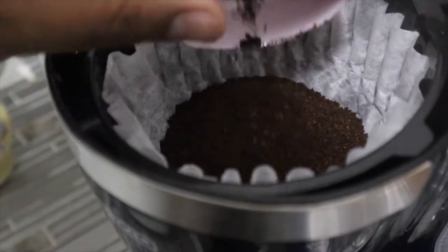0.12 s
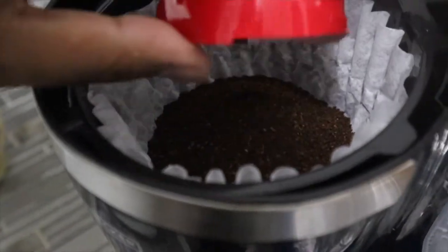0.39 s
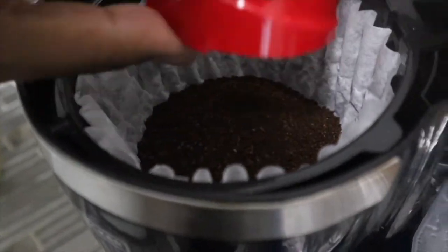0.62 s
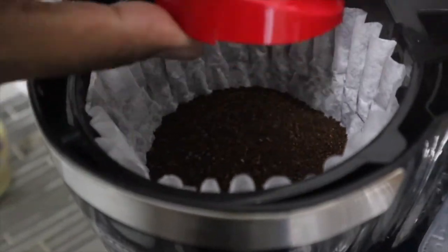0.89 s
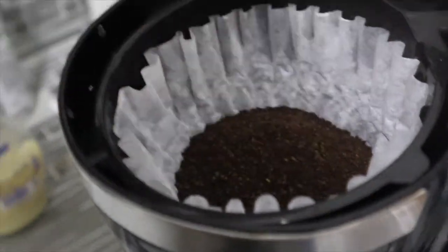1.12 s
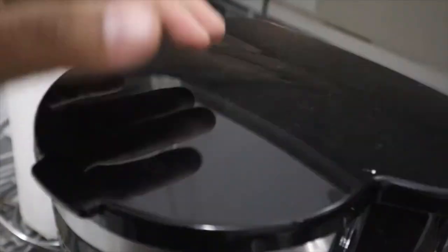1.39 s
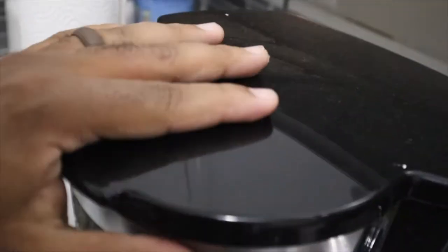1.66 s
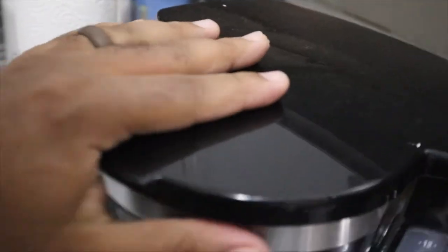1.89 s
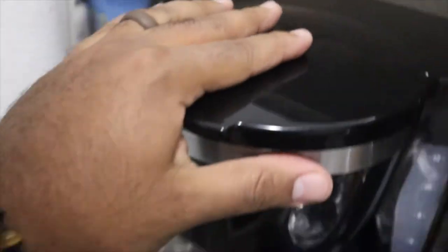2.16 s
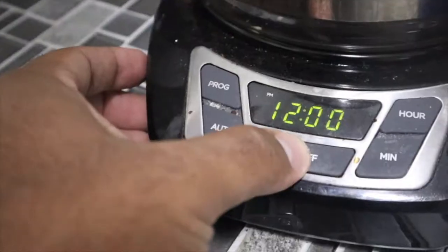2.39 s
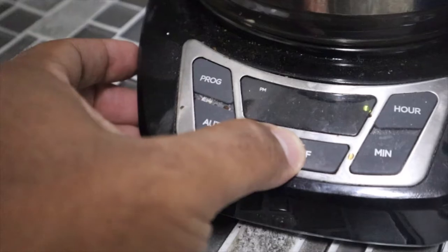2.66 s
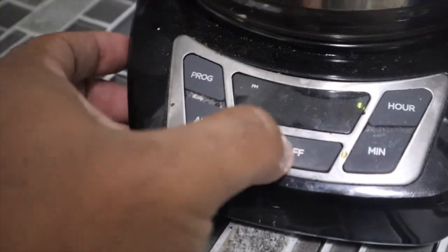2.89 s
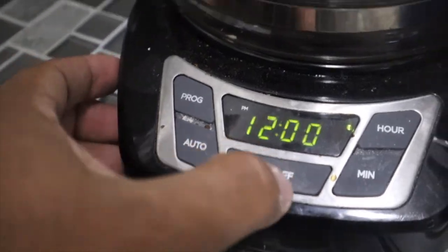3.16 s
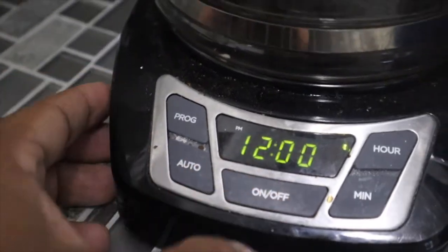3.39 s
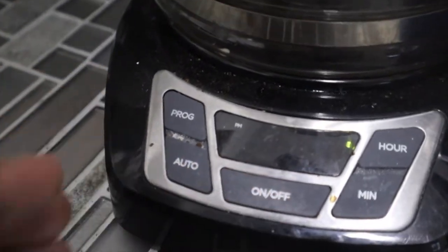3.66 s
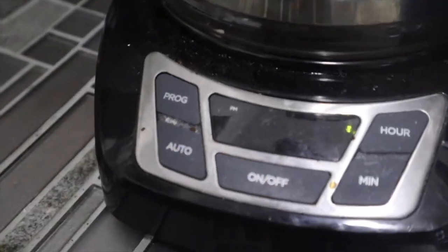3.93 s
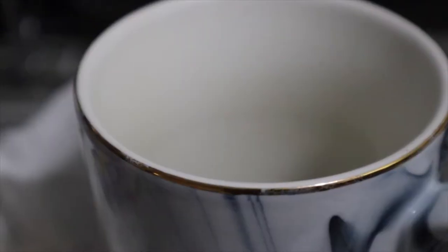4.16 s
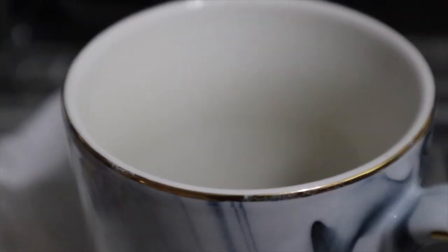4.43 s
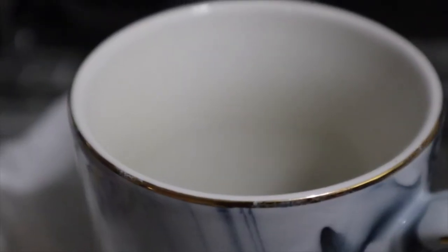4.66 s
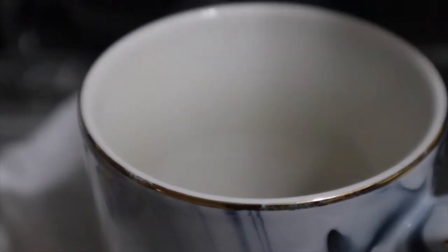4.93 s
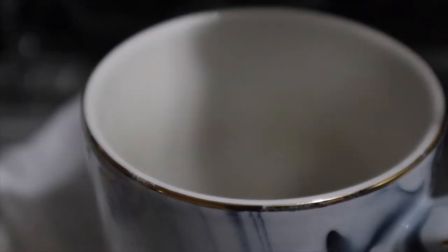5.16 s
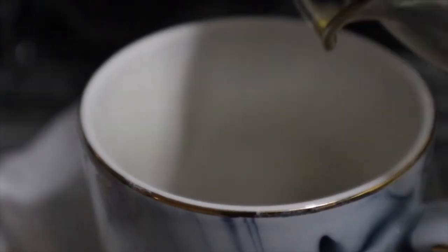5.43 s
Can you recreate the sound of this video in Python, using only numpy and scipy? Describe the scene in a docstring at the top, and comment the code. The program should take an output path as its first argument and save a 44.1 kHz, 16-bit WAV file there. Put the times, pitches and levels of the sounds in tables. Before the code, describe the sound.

A quiet kitchen with a low steady hum, recorded close in stereo with a short room echo. At 0 s the last coffee grounds hiss softly onto paper and die away within half a second; tiny dry ticks follow until 0.7 s. At about 1.25 s plastic knocks lightly, and at 1.42 s the thin lid clatters shut, very loud, with a scrape and a low counter shake, then a lesser tap at 1.58 s. From 1.85 to 2.05 s the machine slides with a rising, squeaky rub, then hollow thuds, loudest at 2.17 s, and dragging that cuts off dead at 2.3 s. A button knocks softly at 2.65 s, a crisp relay snaps at 2.7 s, and the button knocks again at 2.94 s. Faint skin rustles around 3.4 s. A distant reverberant knock sounds at 3.8 s. The room tone crossfades near 4 s to a bassier one; a small lid rattles and a glass jug clinks at 4.5 s, then faint rustling.

```python
"""Coffee maker on a kitchen counter

In a quiet humming kitchen grounds hiss into a paper filter, a plastic lid shuts and the machine is pushed along.
A button and a relay snap, something knocks far off, and a glass jug is lifted over a second room tone.
Blows ring decaying sine modes under a crack of noise; drags, sleeves and grounds are dense random grains.
A resonator bank that follows the hand's speed squeaks, and noise tails give the room in mid and side."""
import sys
import numpy as np
from scipy import signal
from scipy.fft import rfft, irfft, next_fast_len
from scipy.io import wavfile
from scipy.ndimage import uniform_filter1d

SR = 44100
rng = np.random.default_rng(int(sys.argv[2]) if len(sys.argv) > 2 else 0)


def amplitude_ratio(level_db):
    """Convert a level in decibels to the matching linear amplitude (field) ratio."""
    exponent = np.asarray(level_db, float) / 20
    return 10 ** exponent


def put_to_file(sound):
    """Save the sound as 16-bit audio at rate SR, in the file named by the first command-line argument."""
    columns = np.atleast_2d(sound).T  # one column per channel
    safe = np.clip(columns, -1, 1)
    whole_steps = np.round(safe * 32767)
    wavfile.write(sys.argv[1], SR, whole_steps.astype(np.int16))


N = 244739
TIME = np.arange(N) / SR


def evened(x):
    """Scales to rms 1."""
    return x / np.sqrt(np.mean(x ** 2) + 1e-20)


def read(points, hz):
    """Reads a table on a log-frequency axis."""
    f, value = np.transpose(points)
    return np.interp(np.log(hz + 1), np.log(f + 1), value)


def coloured(x, points):
    """Filters the last axis by a (frequency [Hz], level [dB]) spectrum."""
    size = x.shape[-1]
    return irfft(rfft(x) * amplitude_ratio(read(points, np.fft.rfftfreq(size, 1 / SR))), size)


def slow(size):
    """Smooth chance of rms 1, averaged twice over size samples."""
    return evened(uniform_filter1d(uniform_filter1d(rng.standard_normal(N), size), size))


def add(mix, s, sound):
    """Mixes a sound in at time s."""
    part = mix[round(s * SR):][:len(sound)]
    part += sound[:len(part)]


def stroke(start, rise, hold, db, release):
    """Gain of one gesture: a smooth rise, a hold, then a fall in dB per second."""
    t = TIME - start
    fall_db = release * np.maximum(t - rise - hold, 0)
    return amplitude_ratio(db - fall_db) * np.sin(np.pi / 2 * np.clip(t / rise, 0, 1)) ** 2


def grainy(points, per_s, spread_db):
    """Dense tiny contacts of uneven size, coloured by what they rub, at rms 1."""
    size = amplitude_ratio(spread_db * np.minimum(rng.exponential(1, N), 5))
    grains = size * (rng.random(N) < per_s / SR) * rng.standard_normal(N)
    return evened(coloured(grains, points))


# crack of a blow, before its hardness tilts it: (frequency [Hz], level [dB])
CRACK_SPECTRUM = [(300, -24), (1200, 1), (3000, 5.5), (6000, -6), (10000, -12.5), (12500, -13.5),
                  (15500, -51)]


def strikes(blows, modes, crack_s, order=0):
    """Rattling contacts ring modes under a crack; order 1 gives low modes the same sign, -1 alternating signs."""
    low_hz = 500  # modes below this move the whole object
    hz, db, t60 = np.transpose(modes)[:, :, None]
    crack_hz, crack_shape_db = np.transpose(CRACK_SPECTRUM)
    t, out = TIME[:SR // 4], np.zeros(N)
    for s, peak_db, crack_db, hardness, contact_s in blows:
        # the spot that is hit drives each mode one way or the other
        sides = rng.choice([-1, 1], hz.shape)
        if order:
            sides = np.where(hz < low_hz, order ** np.arange(len(hz))[:, None], sides)
        mode_gain = amplitude_ratio(db + hardness * np.log2(hz / 1000) - 60 * t / t60)
        body = (sides * mode_gain * np.sin(2 * np.pi * hz * t)).sum(0)

        rattle = rng.standard_normal(2000) * np.exp(-t[:2000] / (contact_s / 3))
        rattle[0] += 0.62 * np.linalg.norm(rattle)  # stresses the first touch
        ring = signal.fftconvolve(body, rattle)[:len(t)]
        # nothing sounds below half its lowest mode
        ring = signal.lfilter(*signal.butter(2, hz.min() / 2, "high", fs=SR), ring)

        tilted_db = crack_shape_db + hardness * np.log2(crack_hz / 1000)
        crack = coloured(rng.standard_normal(len(t)), np.column_stack([crack_hz, tilted_db]))
        crack *= amplitude_ratio(-60 * t / (crack_s + 2 * contact_s)) * np.minimum(t / 0.0016, 1)
        blow = ring / abs(ring).max() + amplitude_ratio(crack_db) * crack / abs(crack).max()
        add(out, s, amplitude_ratio(peak_db) * blow)
    return out


# width of the diffuse air: (frequency [Hz], side over mid [dB])
DIFFUSE_WIDTH = [(60, -35), (130, -12.5), (290, -9.5), (640, -2), (1410, 2.5), (3100, 6.5), (6820, 7),
                 (15000, 6.5)]


def room_tone(points, db, hums, turn):
    """Steady air and appliance noise; turn [rad] mixes a quarter-cycle copy of the mid into the side."""
    mid, side = coloured(rng.standard_normal((2, N)), points)
    quarter_cycle = signal.hilbert(mid, next_fast_len(N))[:N].imag
    side = np.cos(turn) * side + np.sin(turn) * quarter_cycle
    tone = amplitude_ratio(db) / mid.std() * np.array([mid, coloured(side, DIFFUSE_WIDTH)])
    f = np.fft.rfftfreq(N, 1 / SR)
    for hz, width, hum_db in hums:
        # a narrow band of noise wavers like a hum
        hum = irfft(rfft(rng.standard_normal(N)) / (1 + (2 * (f - hz) / width) ** 2), N)
        tone[0] += amplitude_ratio(hum_db) * evened(hum)
    return tone


# first room tone: (frequency [Hz], level [dB])
FIRST_AIR = [(13, -53), (22, -21), (49, -7), (198, -4), (220, -4), (306, -5.5), (371, -3.5), (403, -9.5),
             (698, -14.5), (869, -15), (970, -20), (1280, -20), (5170, -39.5), (11500, -49.5), (15500, -69)]
# its hums: (frequency [Hz], width [Hz], mid level [dB])
FIRST_HUMS = [(60.1, 0.089, -49), (117.7, 2.8, -63.5), (241.3, 8.9, -56), (321, 12, -58)]


def first_room_tone():
    """Shaped noise and narrow-band hums of the kitchen, faded out late on."""
    fade = np.interp(TIME, (3.81, 4.3), [1, 0])
    return fade * room_tone(FIRST_AIR, -44.5, FIRST_HUMS, -0.71)


# grounds on paper: (frequency [Hz], level [dB])
GROUNDS_SPECTRUM = [(1180, -17), (2000, -6), (2610, -9), (7880, -1.5), (11600, -8), (13200, -13),
                    (13900, -34), (15100, -26), (15500, -73)]


def pouring_grounds():
    """The last grounds fall on paper: dense grains that hold briefly and die away."""
    level_db, hold_s, release_db_per_s = -48, 0.1, 81
    fall_db = release_db_per_s * np.maximum(TIME - hold_s, 0)
    return grainy(GROUNDS_SPECTRUM, 8000, 0.83) * amplitude_ratio(level_db - fall_db)


# small dry ticks of grounds, skin and plastic: (time [s], peak [dB], centre frequency [Hz])
SMALL_TICKS = [(0.2053, -36, 6550), (0.2424, -41, 10200), (0.3497, -43.5, 5880), (0.5432, -48, 7100),
               (0.7128, -47.5, 4050), (2.5293, -46, 4250), (2.904, -49, 6250), (3.191, -46.5, 6070),
               (3.2, -47, 10500), (3.4284, -37, 11400), (4.8648, -39, 7940)]


def ticks():
    """Noise snaps of a few milliseconds, a wide band round their centre."""
    t, out = TIME[:1500], np.zeros(N)
    for s, peak_db, hz in SMALL_TICKS:
        band = [(hz / 4, -24), (hz * 0.65, -4), (hz, 0), (hz * 2, -10)]
        snap = coloured(rng.standard_normal(len(t)), band)
        snap *= amplitude_ratio(-60 * t / 0.019) * np.minimum(t / 0.0019, 1)
        add(out, s, amplitude_ratio(peak_db) * snap / abs(snap).max())
    return out


# hands and sleeves moving: (start [s], rise [s], hold [s], level [dB], release [dB per s])
SLEEVE_MOVES = [(1.121, 0.022, 0.028, -60.5, 600), (3.18, 0.018, .03, -71, 302),
                (3.294, 0.097, 0.18, -60.5, 80), (3.748, 0.027, 0.15, -67, 117),
                (4.16, 0.043, 0.027, -60.5, 40), (4.797, .09, 0.68, -64, 104)]
# skin and cloth: (frequency [Hz], level [dB])
SLEEVE_SPECTRUM = [(1470, -28), (2500, 7), (2640, 5.5), (3340, -3.5), (4170, -0.5), (5360, -6),
                   (6150, -6.5), (9580, -10.5), (11400, -2.5), (14100, -21), (15500, -35)]


def rustles():
    """Hands and sleeves move: dense bright grains swell and fall with each gesture."""
    return grainy(SLEEVE_SPECTRUM, 9000, 0.92) * sum(stroke(*move) for move in SLEEVE_MOVES)


# plastic on plastic: (start [s], hold [s], scrape level [dB], hiss over scrape [dB], scrape release [dB per s])
PLASTIC_DRAGS = [(1.227, 0.11, -50.5, -2.5, 300), (1.457, 0.041, -28, -11.5, 103),
                 (2.062, 0.051, -35.5, -5.5, 300), (2.185, 0.097, -33, -14, 300)]
# scraping housing: (frequency [Hz], level [dB])
SCRAPE_SPECTRUM = [(240, -14), (400, 0), (531, -0.5), (864, 7), (1070, 0), (1520, 0.5), (1700, -5.5),
                   (2000, -2), (2240, -5.5), (4500, -17.5), (5850, -47), (9900, -120)]
# hissing surface, shared with slide(): (frequency [Hz], level [dB])
HISS_SPECTRUM = [(1760, -12), (3000, -10), (3590, -14), (4350, -10.5), (7960, -21.5), (10600, -23),
                 (12400, -31), (15500, -99)]


def drags():
    """Stick and slip of dragged or swung plastic: the housing scrapes and the surface hisses."""
    rise_s = 0.064
    scrape, hiss = np.zeros((2, N))
    for s, hold, db, over_db, release in PLASTIC_DRAGS:
        scrape += stroke(s, rise_s, hold, db, release)
        hiss += stroke(s, rise_s, hold, db + over_db, 1.18 * release)
    return grainy(SCRAPE_SPECTRUM, 3000, 0.61) * scrape + grainy(HISS_SPECTRUM, 9000, 2.0) * hiss


# lid: (time [s], ring peak [dB], crack over ring [dB], hardness [dB per octave], rattling contact [s])
LID_HITS = [(1.233, -28.5, -3.5, -5, 0.015), (1.4165, -5, -7.5, -2.5, 0.008),
            (1.423, -6.5, -0.5, -6, 0.0089), (1.432, -0.5, -14, -3, 0.012), (1.437, 0.5, -7, 0, 0.011),
            (1.447, -9, -3, -5, 0.0025), (1.581, -14, -6, -11, 0.008)]
# modes of the lid: (frequency [Hz], relative level [dB], t60 [s])
LID_MODES = [(243.3, -8, 0.2), (329, 1, 0.099), (403, 7, 0.017), (522, -1, 0.031), (677, 8.5, 0.044),
             (773, 8.5, 0.024), (978, 10, 0.021), (1160, 3.5, 0.025), (1390, -0.5, 0.023),
             (1625, -6, 0.033), (1970, 4.5, 0.027), (2530, -20, 0.016), (3000, -8.5, 0.026),
             (3400, -18, 0.011), (4050, 9, 0.0076), (4440, -2, 0.0023), (5370, -13, 0.017)]


def lid_blows():
    """The thin plastic lid clatters shut and rings its modes."""
    return strikes(LID_HITS, LID_MODES, 0.022, order=1)


# machine: (time [s], ring peak [dB], crack over ring [dB], hardness [dB per octave], rattling contact [s])
MACHINE_HITS = [(1.248, -14.5, -7.5, 3, 0.0055), (2.059, -9, -7.5, -5, 0.013),
                (2.0665, -6, -11, -9.5, 0.0089), (2.079, -11.5, -9, -5.5, 0.0056),
                (2.143, -15.5, -4, -6, 0.047), (2.168, 3.5, -19.5, 1, 0.0071),
                (2.175, -6, -25, 1.5, 0.0021), (2.237, -16, -22, 0, 0.0073),
                (2.2645, -12, 1.5, -8.5, 0.008), (2.277, -11, -9, -0.5, 0.0092)]
# modes of the housing: (frequency [Hz], relative level [dB], t60 [s])
MACHINE_MODES = [(143, -4.5, 0.049), (243, -2.5, 0.069), (314, -2, 0.038), (431, 5, 0.035), (668, 9, 0.02),
                 (810, 3.5, 0.021), (1060, 2, 0.011), (1520, 12.5, 0.0067), (1850, -3, 0.04),
                 (1990, 1, 0.03), (2600, 3.5, 0.0064), (2970, 0.5, 0.015), (3750, -6, 0.011),
                 (4400, -33, .007)]


def machine_blows():
    """The hollow housing thuds as the machine is handled and pushed back."""
    return strikes(MACHINE_HITS, MACHINE_MODES, 0.011, order=1)


# weight on the machine: (start [s], hold [s], counter level [dB], rumble over it [dB], counter release [dB per s])
HAND_LEANS = [(1.428, 0.12, -38.5, 3, 162), (1.663, 0.28, -52, 11, 100), (1.924, 0.0092, -36.5, 4.5, 170),
              (2.054, 0.015, -29, 2, 120), (2.13, 0.013, -28, -2, 198), (2.157, 0.037, -31, 0, 58)]
# shaking counter: (frequency [Hz], level [dB])
COUNTER_SPECTRUM = [(13, -47), (24, -21), (36, -8), (75, 1), (93, -7), (114, -5), (140, -16), (180, -40),
                    (310, -120)]
# rumbling housing: (frequency [Hz], level [dB])
RUMBLE_SPECTRUM = [(18, -41), (30, -15.5), (81, -7), (119, -4.5), (199, 1), (237, 3), (279, -6), (363, -3),
                   (600, -12.5), (780, -31), (1320, -120)]


def leans():
    """The counter shakes and the housing rumbles under the weight of the hands."""
    rise_s = 0.016
    shake, rumble = np.zeros((2, N))
    for s, hold, db, over_db, release in HAND_LEANS:
        shake += stroke(s, rise_s, hold, db, release)
        rumble += stroke(s, rise_s, hold, db + over_db, 1.32 * release)
    return grainy(COUNTER_SPECTRUM, 2000, 3.5) * shake + grainy(RUMBLE_SPECTRUM, 600, 1.9) * rumble


def resonate(x, hz, width):
    """Shifts the curve hz down to zero, smooths, and shifts back."""
    turn = np.exp(2j * np.pi * np.cumsum(hz) / SR)
    r = np.exp(-np.pi * width / SR)
    return 2 * (turn * signal.lfilter([1 - r], [1, -r], x / turn)).real


# squeaky bands: (frequency at speed 1 [Hz], width [Hz], level [dB])
SQUEAK_BANDS = [(940, 380, 1), (1590, 130, 0.5), (2150, 260, 6), (3040, 100, 7), (3650, 2700, -16.5),
                (4470, 150, 0)]


def slide():
    """A hand slides the machine: uneven slips excite resonances that follow its speed; hiss joins later."""
    start_s, rise_s, hold_s, release_db_per_s = 1.853, 0.017, 0.16, 389
    rub_db, hiss_db, sag_db_per_s, hiss_late_s = -33.5, -33.5, 26.5, 0.043
    # speed is a factor on the squeaky bands
    start_speed, speed_up_s, overshoot_hz, slowing_per_s, wobble = 0.59, 0.024, 9.4, 0.12, 0.01
    dull_db_per_octave, brighten_s, flicker_db = 12, 0.05, 1.7
    t = np.maximum(TIME - start_s, 0)

    swing = np.exp(-t / speed_up_s) * np.cos(2 * np.pi * overshoot_hz * t)
    speed = 1 - (1 - start_speed) * swing - slowing_per_s * t
    speed = np.maximum(speed, start_speed) * (1 + wobble * slow(size=700))

    slips = grainy([(200, -24), (800, -4), (6000, -0.5), (9000, 1)], 3500, 0.63)
    dull_db = -dull_db_per_octave * np.maximum(1 - t / brighten_s, 0)  # upper bands come in later
    rub = np.zeros(N)
    for k, (hz, width, db) in enumerate(SQUEAK_BANDS):
        octaves_up = max(np.log2(hz / 2000), 0)
        gain = amplitude_ratio(db + dull_db * octaves_up + flicker_db * slow(size=600))  # each band flickers
        band = resonate(resonate(slips, hz * speed, width), hz * speed, 2 * width)
        rub += (-1) ** k * gain * band
    rub = evened(rub) * stroke(start_s, rise_s, hold_s, rub_db, release_db_per_s)
    hiss = grainy(HISS_SPECTRUM, 9000, 0.8)
    hiss *= stroke(start_s + hiss_late_s, rise_s, hold_s - hiss_late_s, hiss_db, release_db_per_s)
    return (rub + hiss) * amplitude_ratio(-sag_db_per_s * t)


# button: (time [s], ring peak [dB], crack over ring [dB], hardness [dB per octave], rattling contact [s])
BUTTON_HITS = [(2.486, -30, -7.5, -3, 0.0054), (2.651, -20, -13.5, -4.5, 0.013),
               (2.941, -18, -16.5, -3, 0.012)]
# modes of button and panel: (frequency [Hz], relative level [dB], t60 [s])
BUTTON_MODES = [(235.5, -1.5, 0.12), (301, -5, 0.086), (455, -7, 0.016), (656, 7, 0.038), (834, 4.5, 0.037),
                (1130, -1.5, 0.031), (1396, 4, 0.025), (1764, 6, 0.014), (2890, -15, 0.014),
                (4170, -7, 0.012)]


def button_blows():
    """A pressed button knocks and rings its modes, the low ones with alternating signs."""
    return strikes(BUTTON_HITS, BUTTON_MODES, 0.011, order=-1)


# relay: (time [s], ring peak [dB], crack over ring [dB], hardness [dB per octave], rattling contact [s])
RELAY_HITS = [(2.7035, -9.5, -4, 1, 0.0087)]
# modes of the relay: (frequency [Hz], relative level [dB], t60 [s])
RELAY_MODES = [(1416, -5, .015), (2100, -5, .008), (2900, -1, .007), (3800, -3, .006), (5200, -2, .006),
               (6400, -5, .005), (7700, -1, .007), (8800, -3, .006), (10500, -7, .005)]


def relay_snap():
    """A relay snaps over, a rattling contact with short high modes."""
    return strikes(RELAY_HITS, RELAY_MODES, 0.032)


# distant knock: (time [s], level [dB])
DISTANT_KNOCKS = [(3.802, -19.5)]
# its colour: (frequency [Hz], level [dB])
DISTANT_SPECTRUM = [(180, -49), (330, -3.5), (560, -13.5), (800, -0.5), (1490, -6), (4400, -26.5),
                    (5060, -41), (5380, -59), (6280, -34.5), (7550, -46), (7910, -64), (8290, -54),
                    (12000, -42), (15600, -66), (22000, -120)]


def far_knock():
    """A knock in another part of the house: no attack left, only reverberation that builds and dies."""
    t, out = TIME[:SR // 2], np.zeros(N)
    for s, level_db in DISTANT_KNOCKS:
        lumps = amplitude_ratio(2.0 * evened(uniform_filter1d(rng.standard_normal(len(t)), size=300)))
        echo = evened(coloured(rng.standard_normal(len(t)), DISTANT_SPECTRUM)) * lumps / 3
        add(out, s, amplitude_ratio(level_db - 60 * t / 0.48) * (1 - np.exp(-t / 0.0021)) * echo)
    return out


# later room tone: (frequency [Hz], level [dB])
LATER_AIR = [(13, -26), (22, -31), (44, -6), (111, -7.5), (209, -14.5), (246, -10.5), (275, -15.5),
             (450, -22), (801, -24.5), (1020, -29), (1590, -31), (1730, -33), (2400, -37.5), (11500, -55),
             (15500, -63)]
# its hums: (frequency [Hz], width [Hz], mid level [dB])
LATER_HUMS = [(55, 29, -49), (116.7, 18, -46.5), (791, 28, -57), (1600, 21, -69)]


def later_room_tone():
    """A second bed of air noise and hums fades in; the level dips as the two cross."""
    fade = np.interp(TIME, (3.91, 4.207), [0, 1])
    return fade * room_tone(LATER_AIR, -42.5, LATER_HUMS, 0.69)


# jug lid: (time [s], ring peak [dB], crack over ring [dB], hardness [dB per octave], rattling contact [s])
JUG_LID_HITS = [(4.405, -31.5, -0.5, 2, 0.033), (4.444, -27.5, -8, 3, 0.026), (4.542, -28, 6, 2, 0.0042)]
# modes of the jug's lid: (frequency [Hz], relative level [dB], t60 [s])
JUG_LID_MODES = [(1914, 3, 0.047), (2550, -10, 0.017), (3200, -2.5, 0.039), (4230, -15, 0.013),
                 (4740, -3, 0.016), (5460, -11, 0.014), (7200, -6, 0.018), (8080, -5, 0.011),
                 (10940, -7, 0.0048)]


def jug_lid_blows():
    """The jug's small lid rattles on high modes."""
    return strikes(JUG_LID_HITS, JUG_LID_MODES, 0.045)


# glass jug: (time [s], ring peak [dB], crack over ring [dB], hardness [dB per octave], rattling contact [s])
JUG_HITS = [(4.502, -6.5, -2.5, -3.5, 0.0013), (4.511, -12.5, -6, -3.5, 0.0041),
            (4.733, -30.5, -19, -8.5, 0.0065)]
# modes of the jug: (frequency [Hz], relative level [dB], t60 [s])
JUG_MODES = [(272, -22, 0.13), (310, -2.5, 0.094), (315, 1, 0.15), (370, -6, 0.064), (420, -6, 0.095),
             (522, -29, 0.04), (830, -11, 0.022), (1167, 3, 0.03), (1386, -1.5, 0.044), (1600, -7, 0.024),
             (1860, -31, 0.028), (2075, 2, 0.046), (2380, 11, 0.017), (2827, 2, 0.046), (3070, -13, 0.025),
             (3450, -30, .015), (4250, -3, 0.037), (4520, -12, 0.013), (6650, -3, 0.011)]


def jug_blows():
    """The lifted glass jug clinks on brief contacts and rings its modes."""
    return strikes(JUG_HITS, JUG_MODES, 0.0081, order=1)


# decay of the room: (frequency [Hz], t60 [s])
ROOM_DECAY = [(125, 0.86), (500, 0.47), (2000, 0.49), (6000, 0.39), (14000, 0.27)]
# the room answers less in the bass: (frequency [Hz], level [dB])
ROOM_COLOUR = [(100, -9), (300, 1.5), (900, 0), (4000, -1)]
# width of close sound: (frequency [Hz], side gain [dB])
CLOSE_WIDTH = [(60, -30), (125, -23), (250, -16), (500, -10), (1000, -4), (2000, 0), (4000, 3), (8000, 6),
               (12000, 8)]


def kitchen(x, wet_db, near_db, quarter):
    """Mid and side get own tails; side adds near reflections and the source a quarter cycle early or late."""
    hz, t, z = signal.stft(rng.standard_normal((2, SR // 2)), SR, nperseg=256)
    decay = amplitude_ratio(-60 * t / read(ROOM_DECAY, hz)[:, None])
    tail = signal.istft(z * decay, SR, nperseg=256)[1][:, :SR // 2]
    tail *= np.minimum(TIME[:SR // 2] / 0.0055, 1)
    response = amplitude_ratio(wet_db) * coloured(tail / np.linalg.norm(tail[0]), ROOM_COLOUR)
    near = rng.standard_normal(400) * amplitude_ratio(-60 * TIME[:400] / 0.013)
    response[0, 0] += 1  # direct sound
    response[1, :400] += amplitude_ratio(near_db) * near / np.linalg.norm(near)
    mid, side = signal.fftconvolve(x[None], response, axes=1)[:, :N]
    side += quarter * signal.hilbert(x, next_fast_len(N))[:N].imag
    return np.array([mid, coloured(side - 0.16 * x, CLOSE_WIDTH)])  # a little to the right


def scene():
    """Places three groups of sounds in the room over the tones, then decodes mid and side to left and right."""
    machine = lid_blows() + machine_blows() + drags() + leans() + slide()
    panel = pouring_grounds() + ticks() + rustles() + button_blows() + relay_snap() + far_knock()
    jug = jug_lid_blows() + jug_blows()
    cut_s = 2.311  # the drag is cut off here, echo and all
    before_cut = np.clip((cut_s - TIME) / 0.0034, 0, 1)
    mix = before_cut * kitchen(machine, -10.5, -3.0, -0.54)
    mix += kitchen(panel, -13.5, -2.9, -0.55)
    mix += kitchen(jug, -11.0, -0.63, 0.6)
    mix += first_room_tone() + later_room_tone()
    mid, side = mix
    return np.array([mid + side, mid - side])


def band_limit(x):
    """A steep low-pass at the top of the band."""
    return signal.sosfilt(signal.butter(12, 15670, fs=SR, output="sos"), x)


def record(dry):
    """Peaks beyond full scale clip."""
    finished = np.clip(dry, -1, 1)
    return band_limit(finished)


dry = scene()
out = record(dry)
put_to_file(out)
```